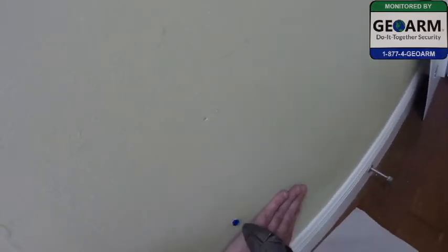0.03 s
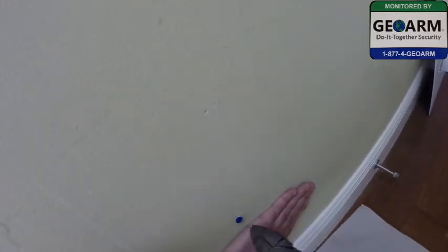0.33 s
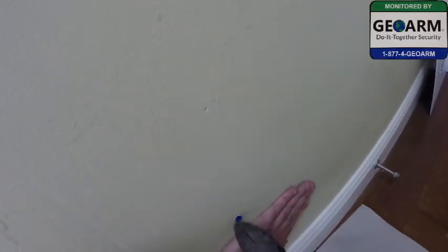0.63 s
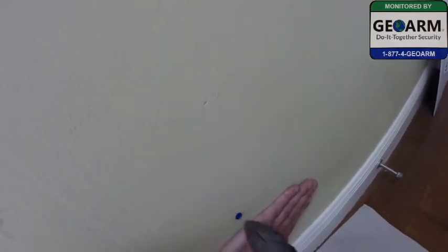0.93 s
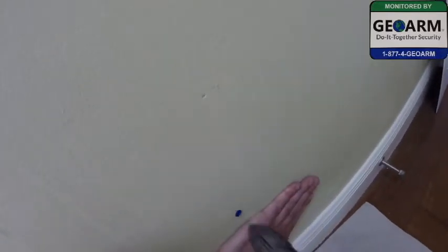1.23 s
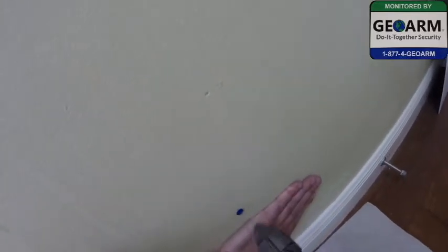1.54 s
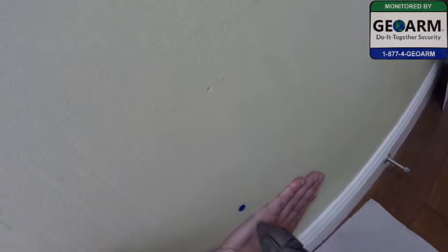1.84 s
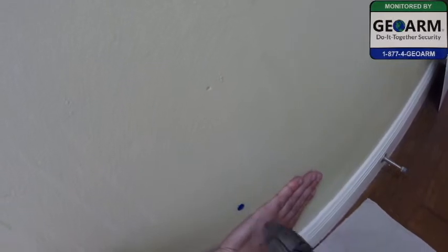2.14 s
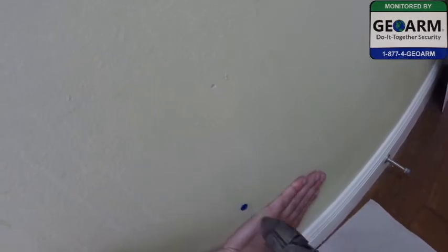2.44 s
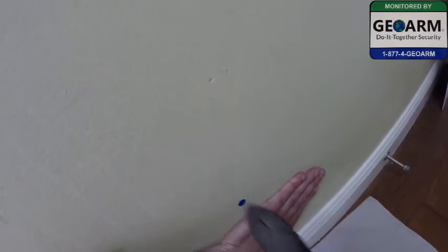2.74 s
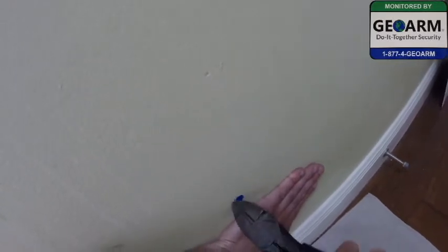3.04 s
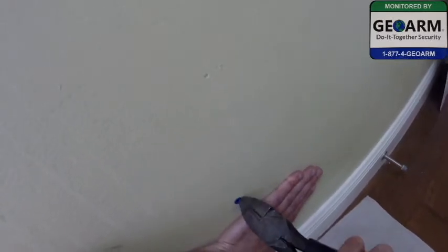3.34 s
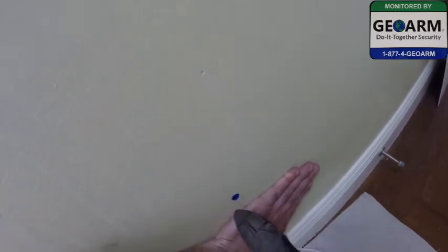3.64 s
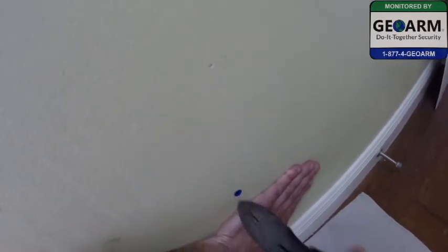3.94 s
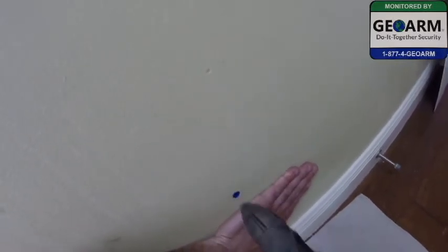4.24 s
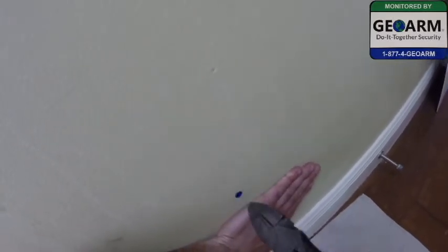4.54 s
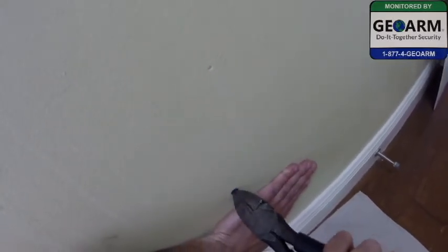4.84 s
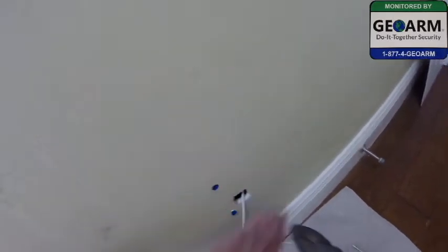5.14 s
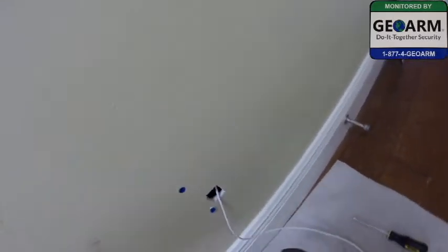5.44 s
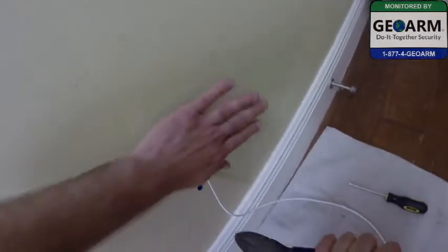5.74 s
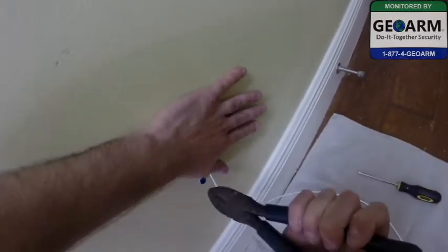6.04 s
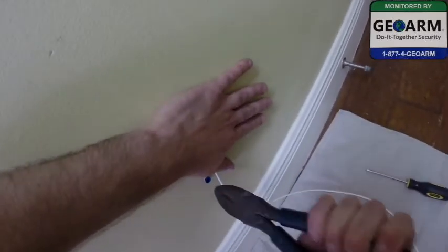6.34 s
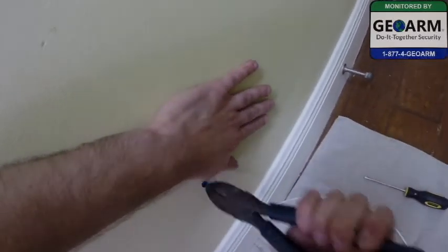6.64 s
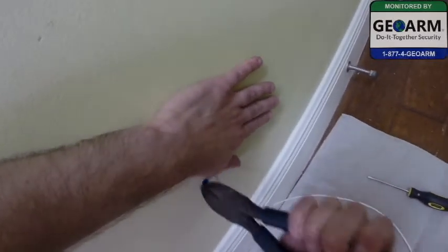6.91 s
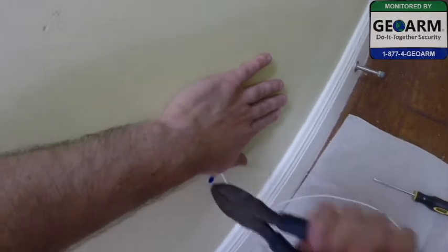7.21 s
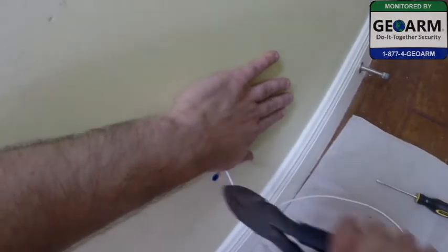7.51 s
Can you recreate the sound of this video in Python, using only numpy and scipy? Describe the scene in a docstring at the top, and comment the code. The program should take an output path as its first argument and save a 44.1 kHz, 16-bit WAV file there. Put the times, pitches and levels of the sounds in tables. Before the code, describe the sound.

Steel pliers tap plastic anchors into a hollow plasterboard wall, heard close up in stereo from a body-worn microphone in a small bare room. Each blow is a sharp click with a hollow drumming thud, followed by a short room boom and ring. After soft rubbing at the start, five knocks come from about 0.6 to 1.7 seconds, roughly four a second, the first one quieter. Five more run from 2.3 to 3.4 seconds, and another five from 3.9 to 4.9. The thud lessens as the anchor seats. A longer pause follows, with only soft rubs and small ticks. From 6.6 to 7.4 seconds, four knocks land on a second anchor with a slightly different tone, thuddy again. Throughout, the microphone mount rubs and ticks softly, close on the left, mostly between runs, over a faint steady hiss.

```python
"""Steel pliers tap plastic anchors into a hollow plasterboard wall, in four short runs.
We are in a small bare room, close to the wall, on the stereo microphone of a body-worn camera.
Each blow clicks on the anchor and drums the panel; the room booms and rings after it.
Right at the microphone the camera mount rubs and ticks softly, over a faint hiss."""
import sys
import numpy as np
from scipy import signal
from scipy.fft import rfft, irfft, next_fast_len
from scipy.io import wavfile
from scipy.ndimage import map_coordinates

SR = 44100
rng = np.random.default_rng(int(sys.argv[2]) if len(sys.argv) > 2 else 0)


def waveform_to_disk(signal):
    """Save audio, clipped to [-1, 1], as 16-bit WAV at the path in sys.argv[1]."""
    frames = np.transpose(np.atleast_2d(signal))
    scaled = np.clip(frames, -1, 1) * 32767
    samples = np.round(scaled).astype(np.int16)
    wavfile.write(sys.argv[1], SR, samples)


N = 338247
RING_TIME = np.arange(int(.9 * SR)) / SR  # seconds since a blow or tick
LEAN = np.array([[.5], [-.5]])  # splits a lean (left minus right, dB) over the two channels
SECOND_ANCHOR_S = 6  # later blows land on the second anchor

# Levels in the tables are relative. Steady hiss: (frequency [Hz], level [dB])
HISS_SPECTRUM = [(15, -31), (25, 16.5), (96, 3), (152, 6), (421, -11.5), (741, -12), (2060, -20.5),
                 (2770, -17.5), (3630, -22.5), (13500, -26.5), (15500, -38)]
# low rub of the camera mount: (frequency [Hz], level [dB])
RUB_SPECTRUM = [(15, -26), (25, -3), (123, 3), (167, -1), (240, 0.5), (339, -7.5), (600, -8), (780, -24),
                (1320, -120)]
# hollow rustle of its shell: (frequency [Hz], level [dB])
RUSTLE_SPECTRUM = [(300, -25), (500, -25.5), (740, -9), (810, -1), (880, -6.5), (980, -13.5), (1500, -24.5),
                   (4000, -34), (8000, -80)]
# rubs of the mount: (time [s], length [s], rub level [dB], rustle level [dB])
MOUNT_RUBS = [(0.0, 0.064, -39, -49.5), (0.127, 0.14, -44, -52.5), (0.319, 0.068, -48.5, -56.5),
              (0.426, 0.27, -51, -59.5), (0.78, 0.033, -36.5, -47), (1.605, 0.013, -32, -40),
              (1.954, 0.072, -46.5, -56.5), (2.055, 0.145, -54, -70), (2.202, 0.05, -40, -50.5),
              (3.712, 0.156, -46, -53), (5.259, 0.11, -46, -55), (5.421, 0.4, -51.5, -59),
              (5.88, 0.19, -54, -59), (6.479, 0.08, -58, -59.5)]
# slips of the mount: (time [s], level [dB], low body level [dB])
MOUNT_TICKS = [(0.073, -32.5, 10), (1.952, -26.5, -9), (2.225, -28, -18), (2.538, -24.5, 6),
               (2.811, -27, -4), (3.653, -27.5, 5), (5.178, -30, 6), (6.018, -31.5, 10), (6.114, -40, 6.5),
               (6.17, -47, 11)]
# ring of its shell: (frequency [Hz], level [dB], t60 [s])
SHELL_MODES = [(762, 1.5, 0.042), (823, -15, 0.22)]

# scattered room sound at its start: (frequency [Hz], level [dB])
TAIL_SPECTRUM = [(25, -58), (80, -44), (200, -42), (350, -47.5), (650, -47.5), (850, -53.5), (1150, -55),
                 (1500, -62), (2400, -67), (3100, -64.5), (3900, -69), (4900, -80), (10500, -87),
                 (15000, -103)]
# its decay: (frequency [Hz], t60 [s])
TAIL_DECAY = [(60, 0.47), (250, 0.81), (700, 0.61), (1500, 0.72), (3500, 0.57), (7000, 0.64), (13000, 0.41)]
# its likeness on left and right: (frequency [Hz], correlation [-1 to 1])
TAIL_LIKENESS = [(80, 0.87), (220, 0.84), (400, -0.026), (620, 0.73), (900, 0.19), (2500, 0.21),
                 (3400, 0.82), (4200, 0.34), (5200, -0.11), (9000, -0.2), (10500, 0.52), (14000, -0.72)]
# standing waves of room and wall cavity: (frequency [Hz], level [dB])
STANDING_WAVES = [(58, -58), (87, -14), (110, -27.5), (141, -14.5), (182, 2.5), (203, -33), (227, -57),
                  (245, -43), (289, -10.5), (301, -45), (318, -25.5), (338, -12), (389, -15.5),
                  (413, -24.5), (432, -54), (479, -16), (494, -9.5), (522, -35), (563, -25), (611, -26.5),
                  (627, -13.5), (692, -13), (711, -19)]
# direct path and near surfaces to the microphone: (delay [ms], left gain [x], right gain [x])
NEAR_PATHS = [(0, 1, 0.74), (.85, -0.15, 0.54), (1.65, -0.37, 0.63)]
# echoes off far surfaces: (delay [ms], left gain [x], right gain [x])
FAR_PATHS = [(6.495, 0.74, 0.27), (11.03, 0.2, 0.76), (25.17, 0.092, 0.59)]
# balance of the tapping at the microphone: (frequency [Hz], lean [dB])
STEREO_TILT = [(70, 12.5), (250, 3.5), (600, -0.5), (2500, -0.5), (8000, -2.5), (14000, -3)]

# plasterboard panel: (frequency [Hz], level [dB], t60 [s], lean [dB])
PANEL_MODES = [(77.4, -22.5, 0.22, 4), (114, -11.5, 0.018, 9), (163.3, -0.5, 0.033, -6.5),
               (325, -34, 0.023, 19), (570, -14.5, 0.065, 5.5), (830, -28, 0.0071, 5),
               (995, -8.5, 0.018, -4.5)]
# clack of pliers and anchor: (frequency [Hz], level [dB], t60 [s], lean [dB])
CLACK_MODES = [(1746, -11, 0.015, -8), (2200, -14, 0.014, -5.5), (2900, -23, 0.033, -6),
               (3150, -34.5, 0.025, 7), (4233, -23.5, 0.011, -6), (5530, -30, 0.0081, -5)]
# click of steel on plastic: (frequency [Hz], level [dB])
CLICK_SPECTRUM = [(200, -26), (1000, 21.5), (3500, 2), (5500, -8.5), (9000, -9), (13000, -13.5),
                  (16000, -21)]
# a blow on a firm anchor: (frequency [Hz], level [dB])
SEATED_COLOUR = [(95, -3), (200, 0.5), (850, -2), (3200, 0), (9000, 0.5)]
# a harder, shorter contact lifts the treble: (frequency [Hz], lift per hardness [dB/dB])
HARDNESS_LIFT = [(250, 0.32), (850, 0.32), (2000, 0.83), (4500, 1.05), (9000, 0.97)]
# an anchor that still slides cushions the blow into a thud: (frequency [Hz], gain [dB])
LOOSE_THUD = [(35, 2), (95, 9), (200, -1.5), (850, -4), (2000, -0.5)]
# the first tap snaps the anchor into its hole: (frequency [Hz], gain [dB])
FIRST_SNAP = [(4000, 2.5), (9000, 8), (14000, 16)]
# the second anchor sits at another spot of the panel: (frequency [Hz], gain [dB])
SECOND_SPOT_COLOUR = [(70, -3), (170, 1), (260, -1.5), (335, 3), (450, -3.5), (620, 3), (950, 0),
                      (1400, -1), (2000, 4), (14000, 5.5)]
# blows of the pliers: (time [s], strength [dB], hardness [dB], jaw ring [Hz], room lean [dB])
PLIER_BLOWS = [(0.5717, -13, -1.5, 2250, 2), (0.858, -5.5, 4, 2380, 1), (1.1297, -4.5, 7.5, 2250, -3),
               (1.3979, -3.5, -1.5, 2150, 2), (1.6617, -1.5, 1, 3830, -7.5), (2.3028, -2, 0.5, 2170, 1.5),
               (2.5681, 1, -5, 3700, -4.5), (2.8273, -1.5, -2, 2200, -4), (3.0937, -1, -3.5, 2030, -5),
               (3.3519, -4.1, 3.5, 4600, -6.5), (3.8832, -1.3, -1, 4380, -1.5),
               (4.1528, 0.6, -5.5, 1770, -3), (4.4073, -0.8, -4.5, 1820, -1.5),
               (4.6659, -3.5, 1.9, 3150, -1), (4.9034, -2.5, 1.5, 2250, -1.5),
               (6.5745, -3.5, -12.5, 2900, 1), (6.8695, -0.4, -5, 1990, 0), (7.142, -1.8, -2, 3130, 2),
               (7.4096, 2.5, -12.5, 2000, 1)]


def amp(db):
    """Decibels to gain."""
    return 10 ** (np.asarray(db) / 20)


def unit(x):
    """x at rms 1."""
    return x / np.sqrt(np.mean(x ** 2) + 1e-20)


def along(points, hz):
    """(Hz, value) points read on a log axis."""
    freqs, values = np.transpose(points)
    return np.interp(np.log(hz + 1), np.log(freqs + 1), values)


def filtered(x, response):
    """x times a complex response of frequency."""
    n = x.shape[-1]
    size = next_fast_len(n + SR // 10, True)
    return irfft(rfft(x, size) * response(np.fft.rfftfreq(size, 1 / SR)), size)[..., :n]


def coloured(x, points):
    """x through a causal filter with the (Hz, dB) points, so that attacks stay sharp."""
    size = 4096
    cepstrum = irfft(np.log(amp(along(points, np.fft.rfftfreq(size, 1 / SR)))))
    folded = np.r_[cepstrum[0], 2 * cepstrum[1:size // 2]]
    kernel = irfft(np.exp(rfft(folded, size)))[:size // 2]
    return signal.fftconvolve(np.atleast_2d(x), kernel[None], axes=1)[:, :x.shape[-1]]


def white(shape):
    """Noise of 0 dB per Hz."""
    return rng.standard_normal(shape) * np.sqrt(SR / 2)


def add(track, time_s, sound):
    """Mix a sound into the track."""
    start = max(round(time_s * SR), 0)
    track[:, start:start + sound.shape[-1]] += sound[..., :N - start]


def stereo_noise(spectrum, width, lean_db):
    """Coloured noise of rms 1, leaning to the left."""
    mid, side = coloured(white((2, N)), spectrum)
    return unit(np.array([mid + width * side, mid - width * side]) * amp(lean_db * LEAN))


def hiss(level_db=-54):
    """A faint, steady floor behind everything."""
    return amp(level_db) * stereo_noise(HISS_SPECTRUM, width=0.83, lean_db=1)


def mount_rubs(uneven_db=2, grip_hz=30, attack_s=0.0044, release_s=0.019):
    """At the microphone the mount rubs unevenly as the body moves; its shell sings with the friction."""
    t = np.arange(N) / SR
    rub, rustle = amp(-61), amp(-68.5)  # the mount at rest
    for start, length, rub_db, rustle_db in MOUNT_RUBS:
        rise = 1 - np.exp(-np.maximum(t - start, 0) / attack_s)
        fall = np.exp(-np.maximum(t - start - length, 0) / release_s)
        rub = np.maximum(rub, amp(rub_db) * rise * fall)
        rustle = np.maximum(rustle, amp(rustle_db) * rise * fall)
    grip_db = uneven_db * map_coordinates(rng.standard_normal(1000), [t * grip_hz], mode="wrap")
    low = rub * amp(3.5 + grip_db) * stereo_noise(RUB_SPECTRUM, width=1, lean_db=14)
    hollow = rustle * amp(0.5) * stereo_noise(RUSTLE_SPECTRUM, width=0.9, lean_db=5)
    return low + hollow


def mount_ticks(gain_db=-4, body_db=-3, body_t60=0.027, attack_s=0.001, lean_db=12):
    """The mount slips a little and its hollow shell rings briefly, close on the left."""
    out = np.zeros((2, N))
    onset = 1 - np.exp(-RING_TIME / attack_s)
    shell = sum(amp(db - 60 * RING_TIME / t60) * np.sin(2 * np.pi * hz * RING_TIME)
                for hz, db, t60 in SHELL_MODES)
    for time_s, db, low_db in MOUNT_TICKS:
        body = unit(coloured(white(len(RING_TIME)), RUB_SPECTRUM))
        body *= amp(body_db + low_db - 60 * RING_TIME / body_t60)
        add(out, time_s, amp(db + gain_db) * (shell + body) * onset)
    return out * amp(lean_db * LEAN)


def room_tail(attack_s=0.00057):
    """The bare room scatters sound around the microphone; each frequency dies at its own speed."""
    hz, t, spectra = signal.stft(white((2, len(RING_TIME))), SR, nperseg=512)
    decay = amp(-60 * t / along(TAIL_DECAY, hz)[:, None])
    spread = np.arccos(np.clip(along(TAIL_LIKENESS, hz), -1, 1))[:, None] / 2
    spectra = spectra * decay * np.array([np.cos(spread), np.sin(spread)])
    mid, side = signal.istft(spectra, SR, nperseg=512)[1][:, :len(RING_TIME)]
    onset = 1 - np.exp(-RING_TIME / attack_s)
    return coloured(np.array([mid + side, mid - side]) * onset, TAIL_SPECTRUM)


def room_boom(gain_db=-15, peak_s=0.038, steepness=2.31, wide_hz=550):
    """Standing waves swell as the wall feeds them, then die; short ones differ more left to right."""
    age = RING_TIME / peak_s
    swell = (age * np.exp(1 - age)) ** steepness
    waves = 0
    for k, (hz, db) in enumerate(STANDING_WAVES):
        phase = rng.choice([-1, 1]) * min(hz / wide_hz, 1) ** 2 * np.array([[1], [-1]])
        waves += (-1) ** k * amp(db) * np.cos(2 * np.pi * hz * RING_TIME + phase)
    return amp(gain_db) * swell * waves


def paths(rows, hz):
    """Left and right response of delayed arrivals at the microphone."""
    return sum(np.array([[left], [right]]) * np.exp(-2j * np.pi * hz * ms / 1000)
               for ms, left, right in rows)


def echoes(hz, dull_hz=1500):
    """Response of the far surfaces, which send the blow back late and dull."""
    return paths(FAR_PATHS, hz) / (1 + 1j * hz / dull_hz)


def ringing(modes, contact_s=0.0002):
    """Left and right sound of damped modes after one kick."""
    kick = (1 - np.exp(-RING_TIME / contact_s)) ** 2
    return kick * sum(amp(db + lean * LEAN - 60 * RING_TIME / t60) * np.cos(2 * np.pi * hz * RING_TIME)
                      for hz, db, t60, lean in modes)


def jaw_ring(x, ring_hz, gain_db, q=5):
    """The loosely hinged jaws ring at a pitch that depends on where they land."""
    def resonance(hz):
        return 1j * hz * ring_hz / (q * (ring_hz ** 2 - hz ** 2) + 1j * hz * ring_hz)
    return filtered(x, lambda hz: 1 + (amp(gain_db) - 1) * resonance(hz))


def anchor_colour(hardness_db, earlier_blows, on_second, seating_blows=3.07):
    """(Hz, dB) colour of a blow: each one drives the anchor firmer, so the thud fades."""
    hz = np.geomspace(50, 16000, 100)
    play = np.exp(-earlier_blows / seating_blows)
    db = along(SEATED_COLOUR, hz) + hardness_db * along(HARDNESS_LIFT, hz)
    db += play * along(LOOSE_THUD, hz)
    db += (earlier_blows == 0) * along(FIRST_SNAP, hz)
    db += on_second * along(SECOND_SPOT_COLOUR, hz)
    return np.column_stack([hz, db])


def strike(rasp_db=-24, skid_t60=0.02, left_delay_ms=0.253):
    """Close up, steel clicks on plastic, the jaws skid with a brief rasp and the panel drums."""
    skid = amp(rasp_db - 60 * RING_TIME / skid_t60) * rng.standard_normal((2, len(RING_TIME)))
    click = coloured((RING_TIME == 0) + skid, CLICK_SPECTRUM)
    from_right = [(0, 0, 1), (left_delay_ms, 1, 0)]
    click = filtered(click, lambda hz: paths(from_right, hz) + echoes(hz))
    panel = filtered(ringing(PANEL_MODES), lambda hz: paths(NEAR_PATHS, hz) + echoes(hz))
    return ringing(CLACK_MODES) + panel + click


def tapping(renew_hz=260, jaw_db=3, jaw_damping=0.17):
    """The pliers tap. Long waves meet the same room each time; short ones scatter anew as they shift."""
    out = np.zeros((2, N))
    room = room_boom() + filtered(room_tail(), lambda hz: renew_hz / np.hypot(hz, renew_hz))
    blows_on_anchor = [0, 0]
    for time_s, strength_db, hardness_db, ring_hz, lean_db in PLIER_BLOWS:
        on_second = int(time_s > SECOND_ANCHOR_S)
        colour = anchor_colour(hardness_db, blows_on_anchor[on_second], on_second)
        blows_on_anchor[on_second] += 1
        blow = strike() + room * amp(lean_db * LEAN)
        fresh_tail = filtered(room_tail(), lambda hz: hz / np.hypot(hz, renew_hz))
        blow = amp(strength_db) * coloured(blow + fresh_tail, colour)
        ring_db = jaw_db - jaw_damping * (strength_db + hardness_db)  # strong, hard blows ring less
        add(out, time_s, jaw_ring(blow, ring_hz, ring_db))
    return filtered(out, lambda hz: amp(along(STEREO_TILT, hz) * LEAN))


def scene():
    """Tapping close ahead, the mount right at the microphone, hiss behind."""
    return tapping() + mount_ticks() + mount_rubs() + hiss()


def record(dry, top_hz=16200):
    """The camera rounds off the highest peaks and keeps nothing above its band limit."""
    rounded = dry / (1 + np.abs(dry) ** 6) ** (1 / 6)
    return filtered(rounded, lambda hz: 1 / (1 + (hz / top_hz) ** 80))


dry = scene()
out = record(dry)
waveform_to_disk(out)
```